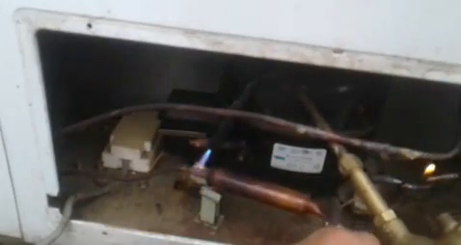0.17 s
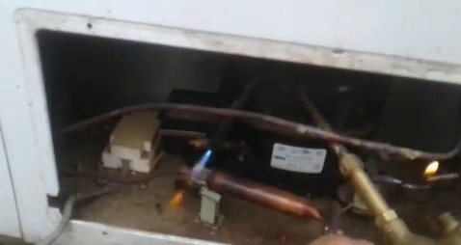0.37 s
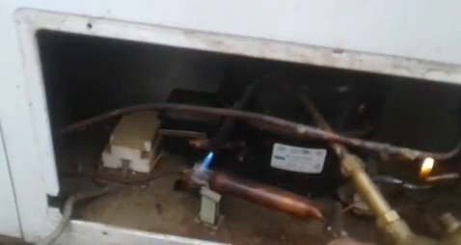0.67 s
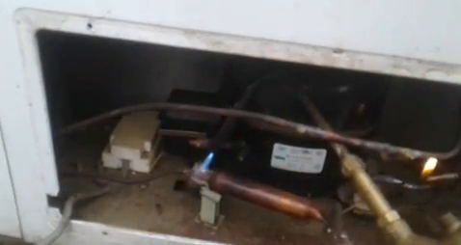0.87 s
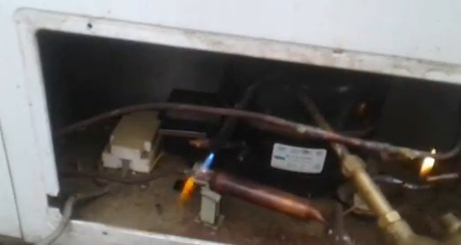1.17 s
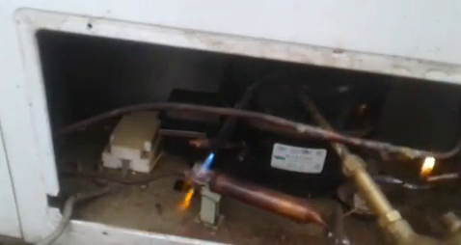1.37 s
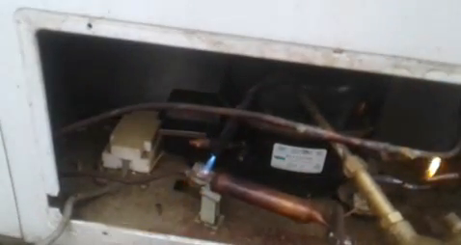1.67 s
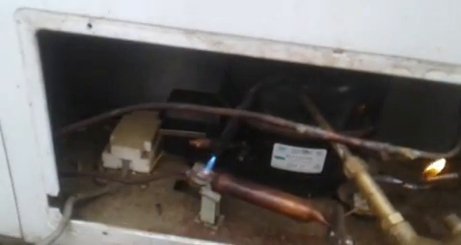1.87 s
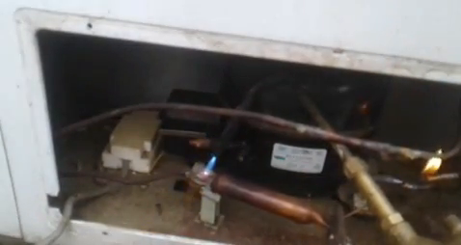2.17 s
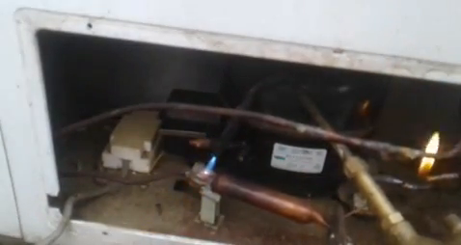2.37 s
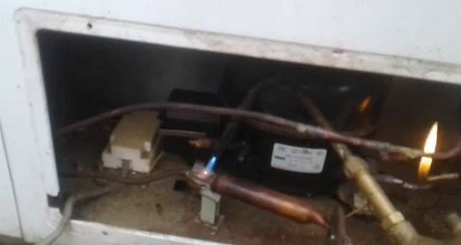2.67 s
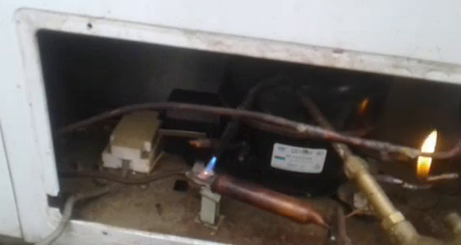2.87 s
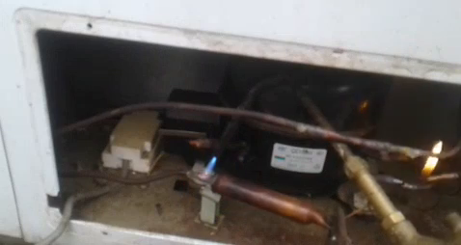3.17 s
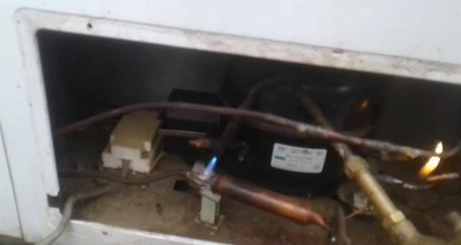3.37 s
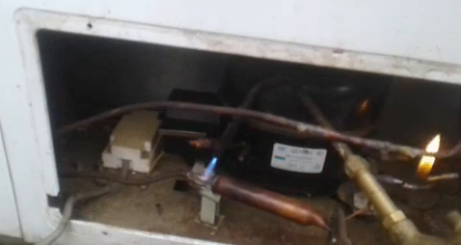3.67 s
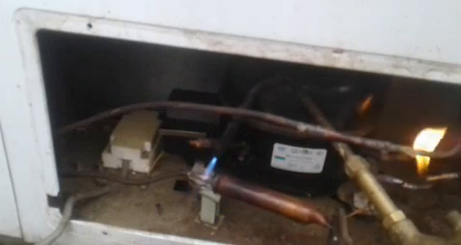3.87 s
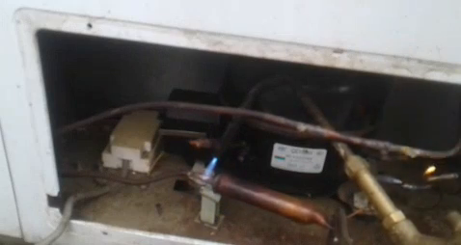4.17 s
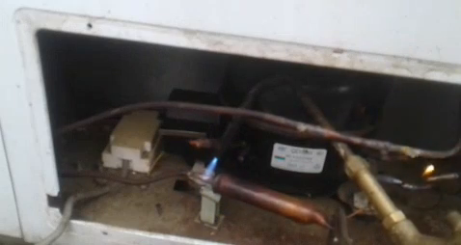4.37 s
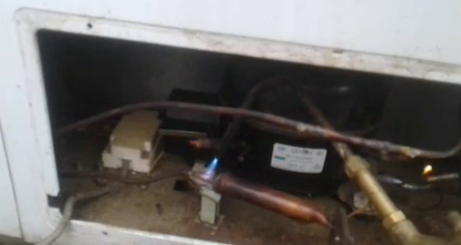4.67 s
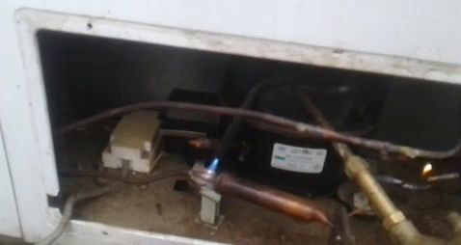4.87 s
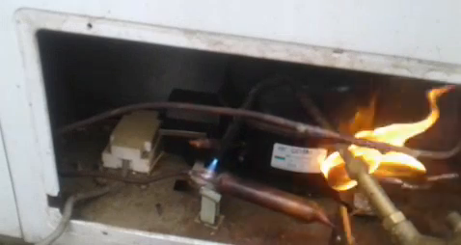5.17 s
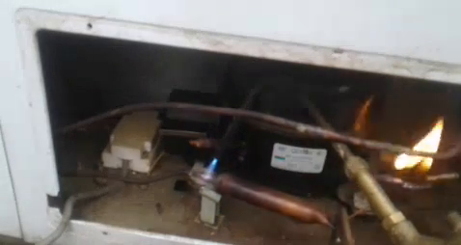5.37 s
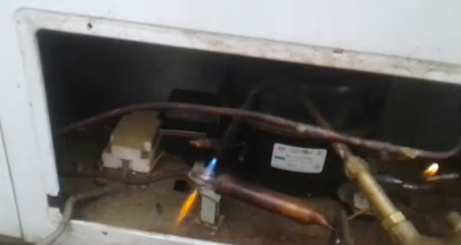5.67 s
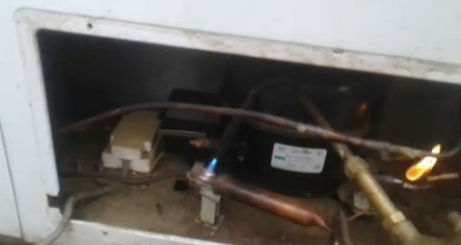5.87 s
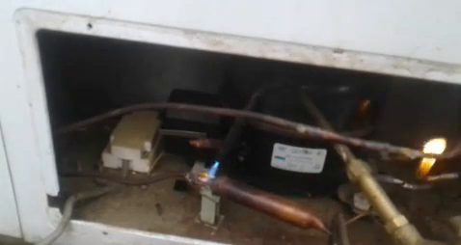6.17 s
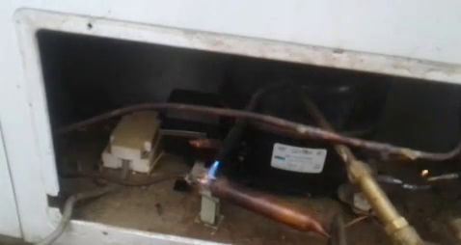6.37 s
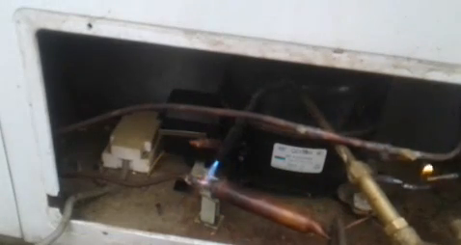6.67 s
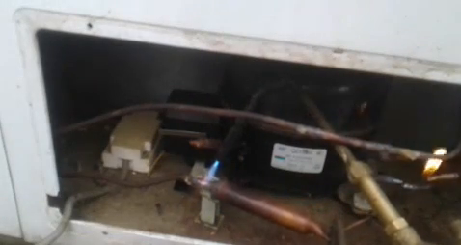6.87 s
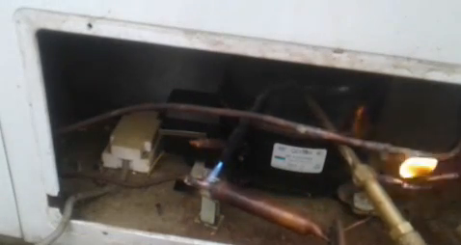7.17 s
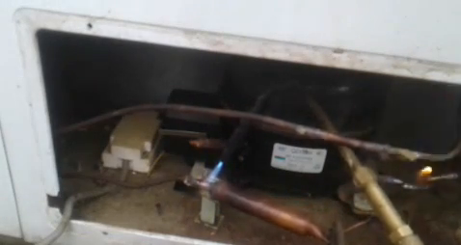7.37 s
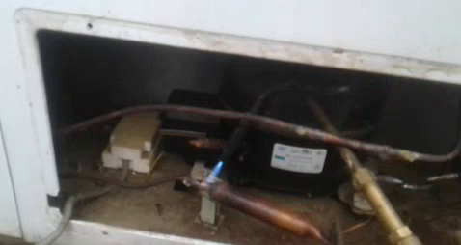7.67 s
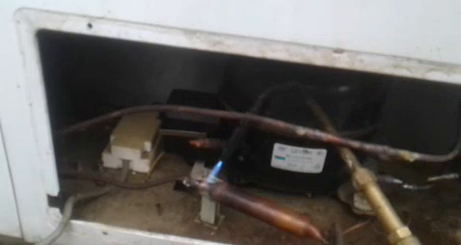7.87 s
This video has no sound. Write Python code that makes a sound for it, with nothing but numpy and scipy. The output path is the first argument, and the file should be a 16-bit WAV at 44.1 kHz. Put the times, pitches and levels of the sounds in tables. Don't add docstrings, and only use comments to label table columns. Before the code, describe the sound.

Steady, harsh jet hiss from a torch flame dominates from start to finish, strongest in the high treble with a ringing, hollow upper-midrange edge from the surrounding panels. The level wavers only slightly, with tiny rapid sputters and small dips around the middle. Faint low roar surges and distant machinery rumble lie beneath, almost masked. Close, centred mono pickup; one dull, soft thump near the end.

```python
import sys
import numpy as np
from scipy import signal
from scipy.fft import rfft, irfft, next_fast_len
from scipy.io import wavfile

SR = 44100
rng = np.random.default_rng(int(sys.argv[2]) if len(sys.argv) > 2 else 0)


def volts(x):
    e = np.asarray(x, float) / 20
    return 10 ** e


def inscribe(sig):
    pcm = np.round(np.clip(np.atleast_2d(sig).T, -1, 1) * 32767)
    wavfile.write(sys.argv[1], SR, pcm.astype(np.int16))


N = 352932

# time_s, hiss_db
FLAME_FORCE = [(0.0, -25.5), (2.78, -26.5), (3.36, -26.5), (3.43, -27.5), (3.96, -26), (4.48, -27),
               (4.94, -27), (4.99, -28), (5.21, -26), (5.26, -28.5), (5.46, -25.5), (5.55, -27.5),
               (5.61, -26.5), (7.08, -26.5), (7.17, -25), (7.84, -26), (7.87, -27.5), (8.0, -25.5)]
# frequency_hz, density_db (per Hz)
JET_SPECTRUM = [(5300, -43), (6050, 0.5), (6500, 2), (7500, 1.2), (9000, -4), (10000, -5.5), (12000, -4),
                (14400, 0.5), (15700, -3.5), (17000, -9)]
# delay_ms, share (of the direct sound)
NEAR_PANELS = [(0.098, 0.09), (0.331, 0.05), (0.439, 0.12), (0.525, -0.06), (0.64, -0.05), (0.82, -0.06),
               (0.942, -0.06), (1.126, 0.07), (1.278, 0.07), (1.606, 0.07), (1.683, -0.09), (1.935, 0.06),
               (2.458, 0.07), (2.772, -0.05)]
POSE_CHANGES = [.65, 1.7, 3.45, 4.7, 6.2, 7.1]
# pose_number, delay_ms, share (of the direct sound)
POSE_ECHOES = [(0, 0.508, -0.19), (0, 1.194, -0.13), (0, 1.48, 0.17), (0, 1.657, 0.12), (1, 0.483, -0.1),
               (1, 0.703, 0.1), (1, 0.875, 0.15), (1, 1.278, -0.18), (2, 0.125, 0.18), (2, 1.322, -0.1),
               (2, 1.388, -0.11), (2, 1.725, 0.07), (2, 4.1, -0.07), (3, 0.24, 0.12), (3, 0.484, 0.16),
               (3, 0.615, -0.11), (3, 1.266, 0.12), (4, 0.235, 0.09), (4, 0.438, -0.13), (4, 0.513, 0.08),
               (4, 0.778, 0.11), (5, 0.205, 0.17), (5, 0.859, -0.12), (5, 0.969, -0.12), (5, 1.42, 0.12),
               (6, 0.124, -0.17), (6, 0.445, 0.21), (6, 0.572, -0.2), (6, 1.241, -0.13), (6, 1.758, 0.14)]
# frequency_hz, width_hz, level_db
BAY_MODES = [(675.0, 139.0, -16.2), (886.0, 107.0, -11.4), (1060.0, 135.0, -12.7), (1190.0, 88.0, -7.4),
             (1469.0, 69.0, -15.4), (1640.0, 118.0, -13.4), (1973.0, 164.0, -8.4), (2105.0, 81.0, -5.8),
             (2372.0, 45.0, -35.8), (2548.0, 45.0, -19.7), (2574.0, 148.0, -10.2), (2764.0, 73.0, -3.0),
             (3200.0, 328.0, -1.0), (3359.0, 121.0, 1.3), (3531.0, 80.0, 3.2), (3873.0, 450.0, -3.1),
             (4125.0, 117.0, -1.1), (4368.0, 89.0, -2.5), (4679.0, 199.0, -5.1), (4915.0, 45.0, -5.2),
             (5105.0, 68.0, -2.7), (5396.0, 87.0, -1.4), (5581.0, 101.0, 3.3), (5932.0, 66.0, -16.5),
             (6189.0, 61.0, -10.0), (6189.0, 199.0, -0.3)]
# frequency_hz, width_hz, depth_db
PANEL_NULLS = [(599.0, 163.0, -20.0), (775.0, 250.0, -15.3), (1281.0, 250.0, -13.2), (1800.0, 185.0, -16.2),
               (1996.0, 119.0, -11.4), (2368.0, 79.0, -6.2), (2988.0, 250.0, -15.8), (3232.0, 250.0, -11.8),
               (3495.0, 250.0, -9.0), (3771.0, 112.0, -9.0), (3905.0, 147.0, -10.5), (4493.0, 84.0, -7.4),
               (4967.0, 30.0, -0.8), (5542.0, 125.0, -7.6), (5828.0, 97.0, -4.1), (5992.0, 46.0, -2.6)]
# start_s, end_s, frequency_hz, gain_db
GLINTS = [(-0.4, 1.2, 6100, -4), (-0.4, 1.74, 6980, 4.5), (-0.4, 2.4, 8000, 4), (-0.4, 2.8, 13160, -3.3),
          (0.1, 4.9, 8240, -2.5), (0.7, 3.3, 14160, -3.4), (0.8, 3.0, 2440, 2), (0.9, 7.5, 8680, 1.3),
          (1.0, 1.8, 13510, -9), (1.0, 2.8, 11890, 2), (1.2, 3.2, 3070, 3), (1.3, 2.7, 14540, -8),
          (1.6, 2.8, 11650, -1), (1.8, 4.5, 8550, -5.5), (1.9, 3.1, 12130, 5.9), (2.8, 5.6, 9000, 0),
          (2.9, 5.5, 15330, 4.2), (3.3, 5.6, 4720, 3), (3.6, 11, 2410, -4.5), (4.8, 6.4, 10300, -3),
          (5.0, 8.4, 5650, 3.5), (5.6, 7, 12990, 3), (5.7, 6.5, 2310, 4.5), (5.8, 7, 11800, 4.5),
          (6.0, 8.4, 6200, -8.5), (6.2, 8.4, 4130, -5.5), (6.6, 9.4, 5930, 1), (6.8, 8.4, 9720, 4.6),
          (7.0, 7.2, 14230, 1), (7.2, 9.2, 12600, -13)]
# frequency_hz, width_hz, level_db
ROAR_MODES = [
    (195, 70, -5),
    (248, 60, -1),
    (294, 50, 0),
]
# centre_s, rise_db, half_length_s
SURGES = [
    (0.503, 4.5, 0.38),
    (1.347, 2, 0.15),
    (1.87, 5, 0.089),
    (3.1, 2, .3),
    (3.85, 5.5, 0.15),
    (4.25, 4, 0.083),
    (5.053, 3, 0.056),
    (5.45, 5, .08),
    (5.747, 6.5, .08),
    (7.27, 4, .2),
]
# frequency_hz, density_db (per Hz)
DIFFUSE_SPECTRUM = [(300, -30), (600, -11), (1000, -9), (3000, -6), (6000, 0), (7000, -20)]
# frequency_hz, density_db (per Hz)
FLOOR_SPECTRUM = [(15, -14), (25, -10), (41, -13), (50, -3), (62, -12), (80, -4), (116, -1.5), (170, -0.5),
                  (350, -4.5), (520, -7.5), (800, -20)]
# centre_s, level_db, pitch_hz, length_s
PUFFS = [
    (1.735, -59, 490, .08),
    (5.09, -57, 460, .05),
    (7.44, -60, 430, .05),
]
# start_s, peak_db, pitch_hz, t60_s
KNOCKS = [
    (7.817, -44.5, 85, 0.11),
]

SPUTTER_DB, SPUTTERS_PER_S = 0.44, 23
EDDY_RATE = 25
TREBLE_DB, UPPER_BAY_DB, LOWER_BAY_DB = -1.16, -6, -19.5
LOWER_BAY_FOLLOWS = 1.7
PANEL_STRENGTH, POSE_STRENGTH, POSE_FADE_S = 1, 1.34, 0.13
GLINT_WIDTH_HZ, GLINT_FADE_S = 160, 0.11
ROAR_DB, ROAR_WAVER_DB, ROAR_FLICKER_DB = -55.5, 0.96, 1.2
DIFFUSE_DB, FLOOR_DB = -54, -59.5
TOP_HZ = 15745
TIME_S = np.arange(N) / SR


def rms_one(x):
    return x / np.sqrt(np.mean(x ** 2) + 1e-20)


def drift(rate):
    r = np.exp(-40 * np.pi * rate / SR)
    slow = signal.lfilter([1], [1, -2 * r, r * r], rng.standard_normal(N // 20 + 4002))
    slow = slow[4000:]
    return np.interp(np.arange(N) / 20, np.arange(len(slow)), rms_one(slow - slow.mean()))


def colour(x, spectrum):
    size = next_fast_len(N)
    hz, db = np.transpose(spectrum)
    log_hz = np.log(np.maximum(np.arange(size // 2 + 1) * SR / size, 1))
    gain = volts(np.interp(log_hz, np.log(hz), db))
    return rms_one(irfft(rfft(x, size) * gain, size)[:N])


def resonance(x, hz, width_hz):
    r = np.exp(-np.pi * width_hz / SR)
    poles = [1, -2 * r * np.cos(2 * np.pi * hz / SR), r * r]
    return signal.lfilter([(1 - r * r) / 2, 0, (r * r - 1) / 2], poles, x)


def held(s, start, end, fade_s):
    return np.tanh((s - start) / fade_s) / 2 + np.tanh((end - s) / fade_s) / 2


def turbulence(flutter, own_db, spit_db):
    sizes = volts(3 * np.minimum(rng.exponential(1, N), 3)) * rng.choice([-1, 1], N)
    spits = rms_one(sizes * (rng.random(N) < 1500 / SR))
    white = rng.standard_normal((2, N))
    edges_hz = [20, 1400, 3800, 8500, 11500, 20000]
    noise = 0
    for k, band in enumerate(zip(edges_hz, edges_hz[1:])):
        band_filter = signal.butter(3, band, "band", fs=SR, output="sos")
        eddies = signal.sosfilt(band_filter, white[k % 2])
        noise = noise + volts(own_db * drift(EDDY_RATE)) * eddies
    return flutter * (noise + volts(spit_db) * spits)


def panel_echoes(x, echo_db, sway_ms):
    size = next_fast_len(N)
    slow_sway, quick_sway = drift(.12), drift(.3)
    fine = 3 * irfft(rfft(x, size), 3 * size)
    out = x.copy()
    for lag_ms, a, b, side in rng.uniform([2.5, -1, -1, -1], [9, 1, 1, 1], (9, 4)):
        lag = (lag_ms + sway_ms * (a * slow_sway + b * quick_sway)) * SR / 1000
        echo = fine[(3 * (np.arange(N) - lag)).astype(int)]
        out += volts(echo_db - lag_ms) * np.sign(side) * echo
    return rms_one(out)


def reflect(spectrum, echoes, strength):
    hz = np.arange(len(spectrum)) * SR / next_fast_len(N)
    copies = sum(strength * share * np.exp(-2j * np.pi * hz * ms / 1000) for ms, share in echoes)
    return spectrum * (1 + copies)


def poses(x):
    size, out = next_fast_len(N), 0
    near = reflect(rfft(x, size), NEAR_PANELS, PANEL_STRENGTH)
    bounds = [-np.inf, *POSE_CHANGES, np.inf]
    for pose, (start, end) in enumerate(zip(bounds, bounds[1:])):
        echoes = [row[1:] for row in POSE_ECHOES if row[0] == pose]
        posed = rms_one(irfft(reflect(near, echoes, POSE_STRENGTH), size)[:N])
        out = out + held(TIME_S, start, end, POSE_FADE_S) * posed
    return out


def nulls(x):
    for hz, width, db in PANEL_NULLS:
        x = x + (volts(db) - 1) * resonance(x, hz, width)
    return x


def bay(x, wander_db):
    feeds = volts(wander_db * rng.standard_normal((len(BAY_MODES), 12)))
    along = np.linspace(0, 11, N)
    ringing = 0
    for k, (hz, width, db) in enumerate(BAY_MODES):
        feed = np.interp(along, np.arange(12), feeds[k])
        ringing = ringing + (-1) ** k * volts(db) * feed * resonance(x, hz, width)
    return nulls(ringing)


def glints(x):
    x = x.copy()
    for start, end, hz, db in GLINTS:
        span = slice(max(round((start - .4) * SR), 0), min(round((end + .4) * SR), N))
        s = np.arange(span.start, span.stop + 256, 256) / SR
        strip_gain = volts(db * held(s, start, end, GLINT_FADE_S)) - 1
        gain = np.interp(np.arange(span.start, span.stop) / SR, s, strip_gain)
        x[span] += gain * resonance(x[span], hz, GLINT_WIDTH_HZ)
    return x


def torch():
    flutter = volts(.9 * drift(75))
    treble = colour(turbulence(flutter, own_db=.7, spit_db=-4), JET_SPECTRUM)
    treble = poses(panel_echoes(treble, echo_db=-9, sway_ms=.03))

    inside = bay(turbulence(flutter, own_db=.6, spit_db=-6), wander_db=.9)
    inside = signal.sosfilt(signal.butter(7, [520, 6330], "band", fs=SR, output="sos"), inside)
    lower = signal.sosfiltfilt(signal.butter(6, 2370, fs=SR, output="sos"), inside)
    upper = inside - lower

    force_s, hiss_db = np.transpose(FLAME_FORCE)
    force_db = np.interp(TIME_S, force_s, hiss_db) + SPUTTER_DB * drift(SPUTTERS_PER_S)
    lower_db = force_db.mean() + LOWER_BAY_FOLLOWS * (force_db - force_db.mean())
    ringing = volts(force_db + UPPER_BAY_DB) * rms_one(upper) + volts(lower_db + LOWER_BAY_DB) * rms_one(lower)
    return glints(volts(force_db + TREBLE_DB) * treble + ringing)


def roar():
    rings = 0
    for hz, width, db in ROAR_MODES:
        skirted = resonance(rng.standard_normal(N), hz, 2 * width)
        rings = rings + volts(db) * resonance(skirted, hz, width)
    surge_db = sum(db * np.exp(-((TIME_S - s) / half_s) ** 2) for s, db, half_s in SURGES)
    level_db = ROAR_DB + surge_db + ROAR_FLICKER_DB * drift(13) + ROAR_WAVER_DB * drift(3.9)
    return volts(level_db) * rms_one(signal.sosfilt(signal.butter(4, 380, fs=SR, output="sos"), rings))


def scattered_hiss():
    return volts(DIFFUSE_DB) * colour(rng.standard_normal(N), DIFFUSE_SPECTRUM)


def workshop_floor():
    return volts(FLOOR_DB) * colour(rng.standard_normal(N), FLOOR_SPECTRUM)


def puffs():
    noise, out = rng.standard_normal(N), 0
    for s, db, hz, length in PUFFS:
        swell = np.exp(-((TIME_S - s) / length * 2) ** 2)
        out = out + volts(db) * swell * rms_one(resonance(resonance(noise, hz, 110), hz, 110))
    return out


def thump():
    out = np.zeros(N)
    for s, db, hz, t60 in KNOCKS:
        age = np.maximum(TIME_S - s, 0)
        onset = 1 - np.exp(-age / .004)
        out += volts(db - 60 * age / t60) * onset * np.sin(2 * np.pi * hz * age)
    return out


def scene():
    mix = torch() + roar() + scattered_hiss() + workshop_floor() + puffs() + thump()
    return np.tile(mix, (2, 1))


def low_pass(x):
    return signal.sosfilt(signal.butter(12, 16670, fs=SR, output="sos"), x)


def record(dry):
    size = next_fast_len(N)
    hz = np.arange(size // 2 + 1) * SR / size
    wall = volts(-1.6 * np.clip(hz - TOP_HZ, 0, 90))
    cut = irfft(rfft(dry[0], size) * wall, size)[:N]
    return low_pass(np.tile(cut, (2, 1)))


dry = scene()
out = record(dry)
inscribe(out)
```